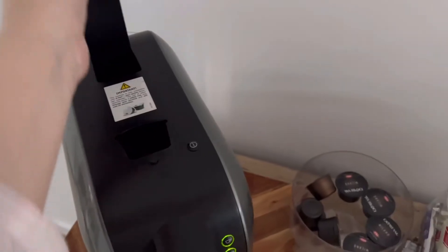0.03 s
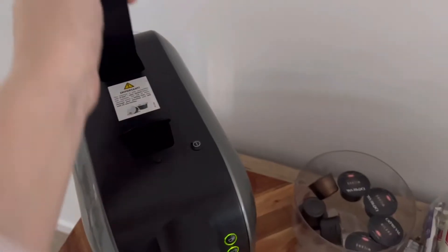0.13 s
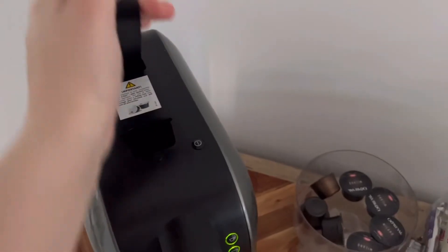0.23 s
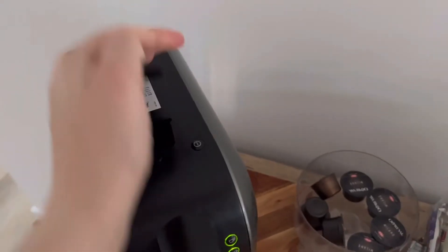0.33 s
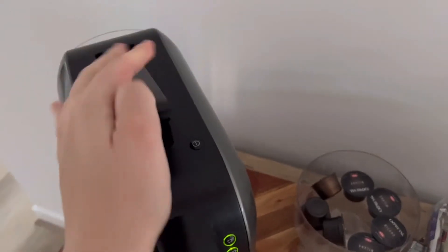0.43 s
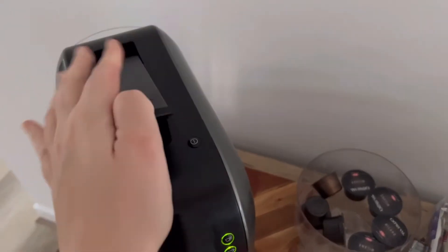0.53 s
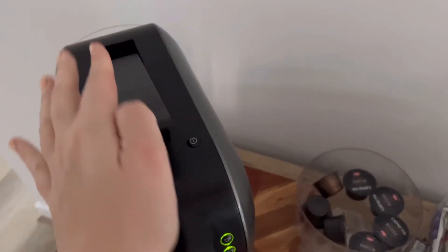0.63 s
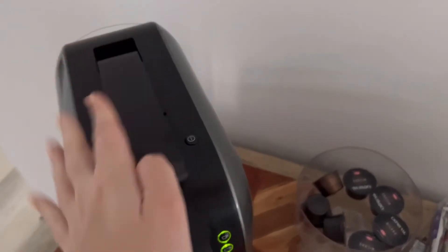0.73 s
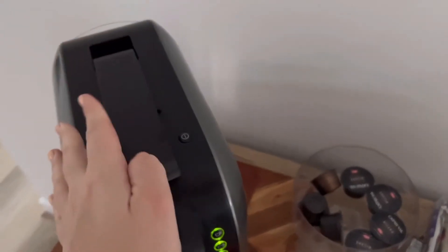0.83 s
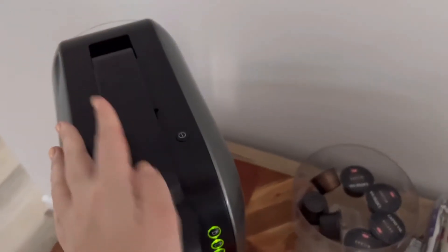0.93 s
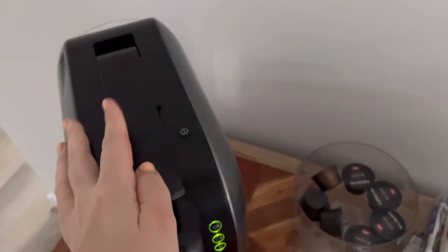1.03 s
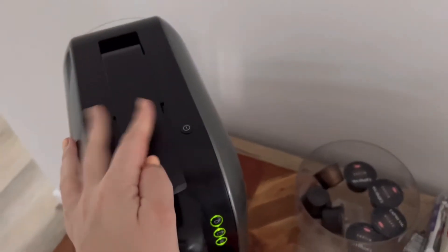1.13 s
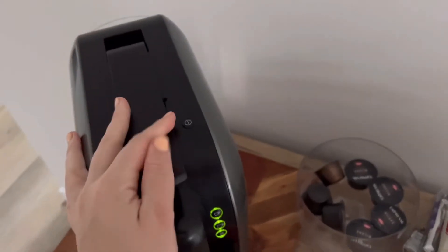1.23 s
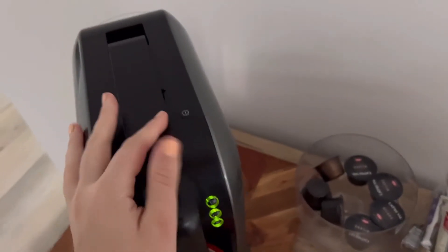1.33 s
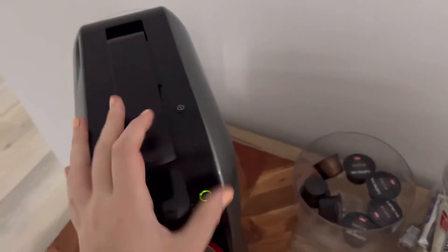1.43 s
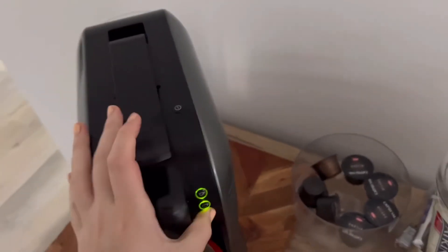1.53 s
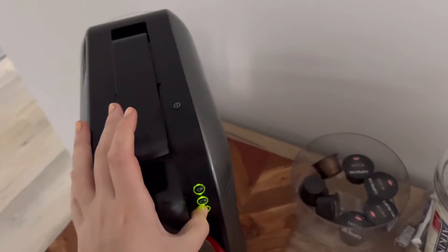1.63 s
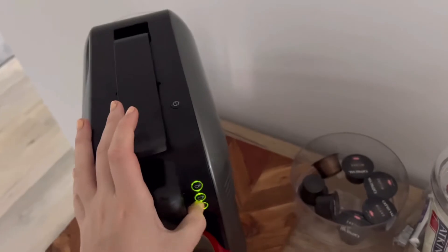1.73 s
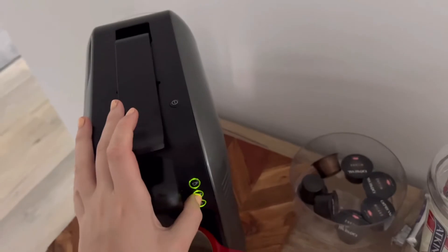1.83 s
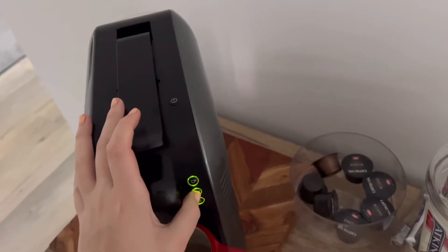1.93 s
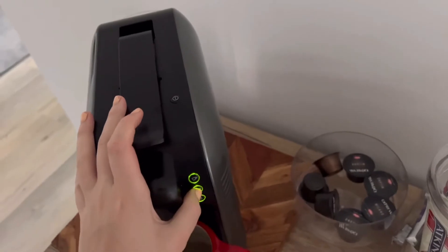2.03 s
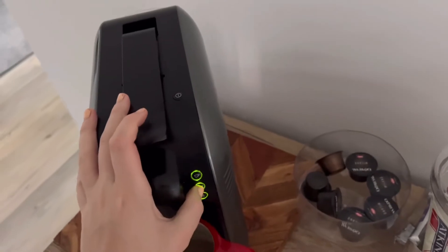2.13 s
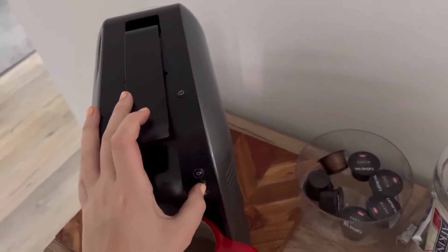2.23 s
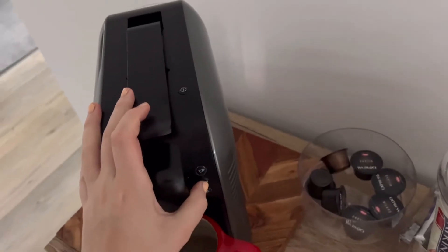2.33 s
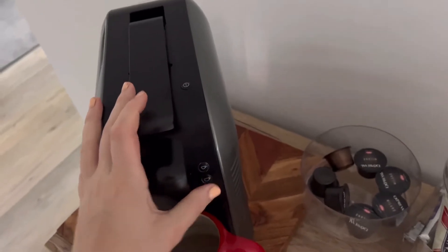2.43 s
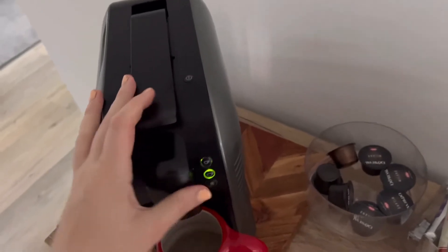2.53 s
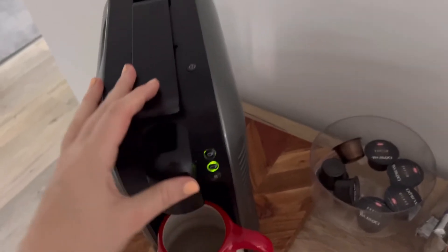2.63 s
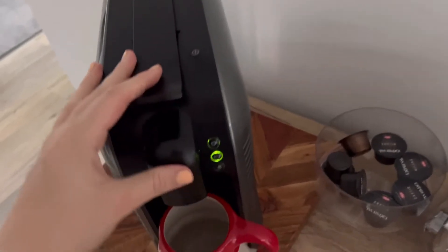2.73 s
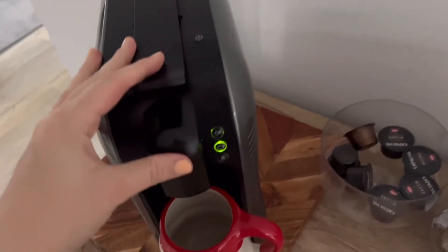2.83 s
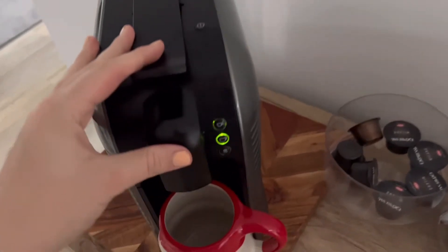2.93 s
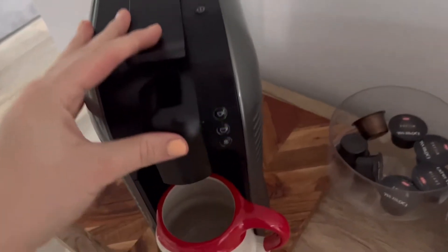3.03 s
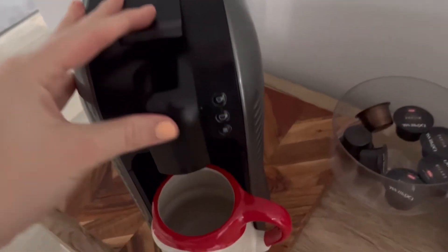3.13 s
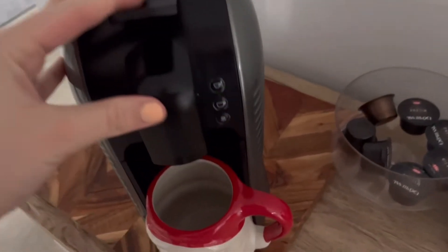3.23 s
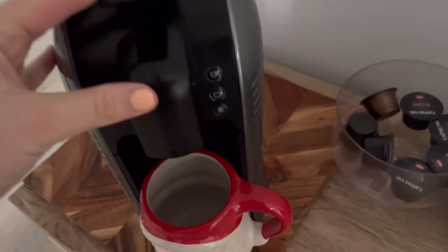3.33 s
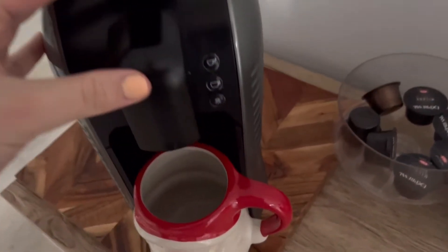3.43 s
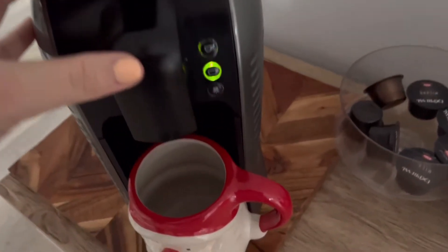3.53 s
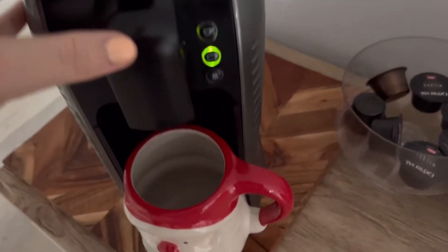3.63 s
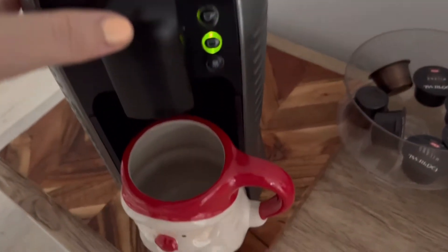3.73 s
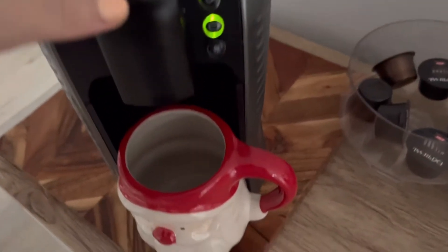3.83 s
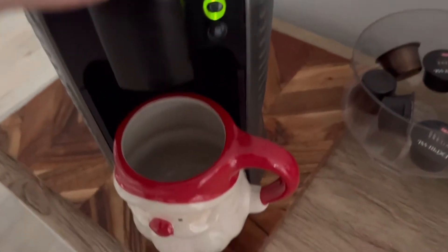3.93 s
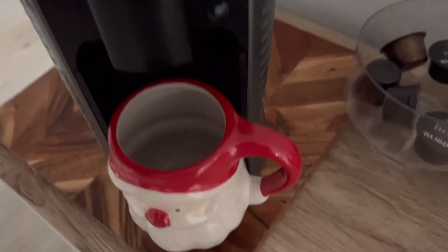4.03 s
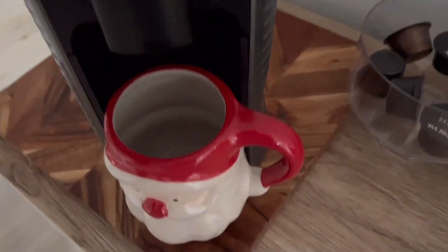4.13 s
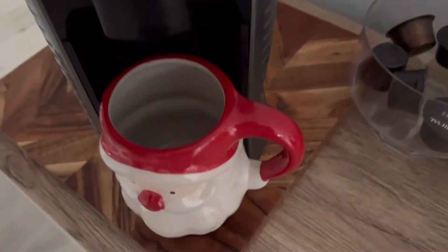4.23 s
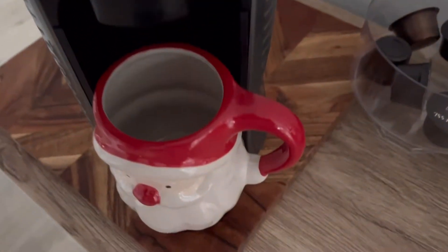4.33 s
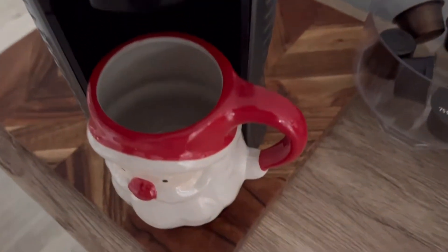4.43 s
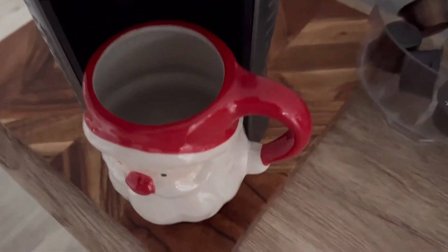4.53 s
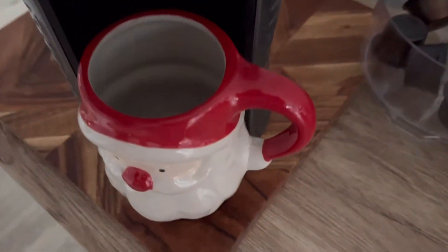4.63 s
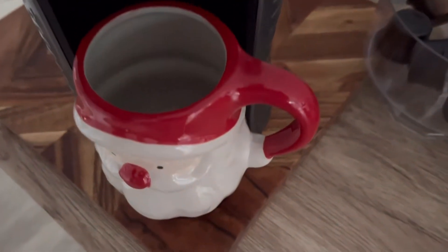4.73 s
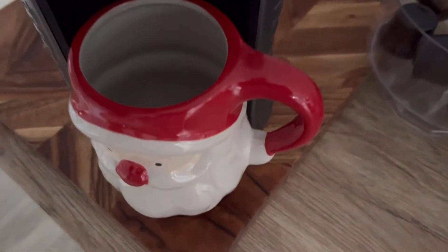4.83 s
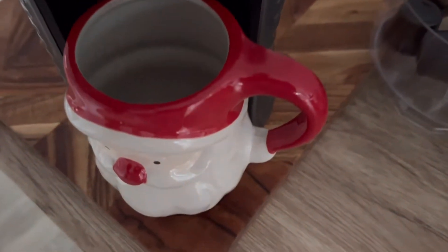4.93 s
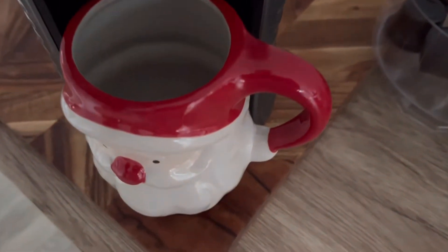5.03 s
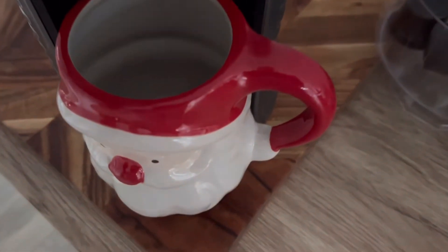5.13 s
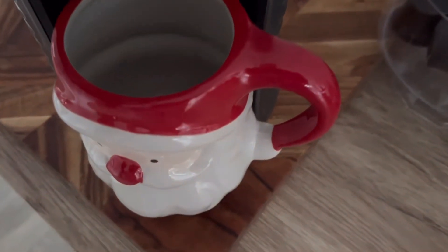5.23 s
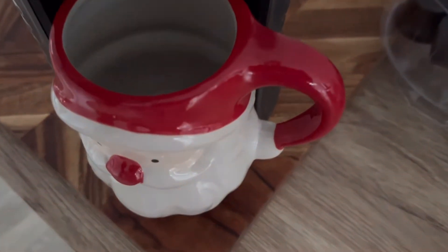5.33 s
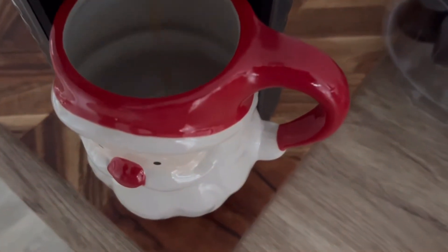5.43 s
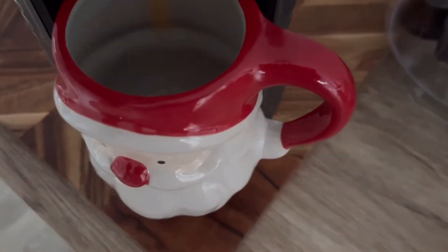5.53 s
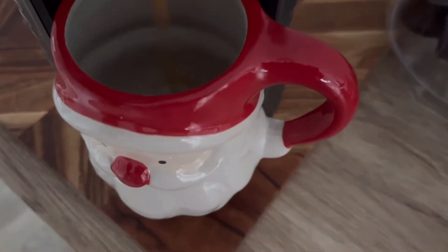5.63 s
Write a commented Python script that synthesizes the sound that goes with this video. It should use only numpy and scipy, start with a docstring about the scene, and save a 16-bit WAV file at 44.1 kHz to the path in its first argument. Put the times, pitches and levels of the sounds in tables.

```python
"""Capsule coffee machine

On a wooden counter, at arm's length in a bare kitchen. A hand rubs the case, the lever drags and snaps
over its latch, the lid knocks shut and the plastic case rocks; a button clicks. Then the piston pump
strokes at mains rate, its hum and rattle changing as pressure builds. The valve hisses, spits air and
squeaks; bubbles sizzle as water reaches the grounds."""
import sys
import numpy as np
from scipy import signal
from scipy.fft import rfft, irfft
from scipy.io import wavfile

SR = 44100
rng = np.random.default_rng(int(sys.argv[2]) if len(sys.argv) > 2 else 0)


def to_wav(sig):
    """Store sig (one row per channel, or 1-D mono) as 16-bit WAV at the path in sys.argv[1].

    Samples outside -1..1 are clipped; the rate is SR.
    """
    pcm = np.clip(np.atleast_2d(sig), -1, 1) * 32767
    pcm = np.round(pcm).astype(np.int16)
    wavfile.write(sys.argv[1], SR, pcm.T)  # frames by channels


N = 250929
T = np.arange(N) / SR


def undb(db):
    """Decibels to gain."""
    return 10 ** (np.asarray(db) / 20)


def unit(x):
    """Scale to rms 1."""
    return x / np.sqrt(np.mean(x ** 2))


def gain_at(points, hz):
    """Gain of a (frequency [Hz], level [dB]) spectrum at hz."""
    f, db = np.transpose(points)
    return undb(np.interp(np.log(np.maximum(hz, 1)), np.log(f), db))


def minimum_phase(log_gain):
    """Complex log spectrum of a causal filter, by cepstral folding."""
    cepstrum = irfft(log_gain)
    half = len(cepstrum) // 2
    cepstrum[1:half] *= 2
    cepstrum[half + 1:] = 0
    return rfft(cepstrum)


def convolve(x, response):
    """Convolve, keeping the length."""
    return signal.fftconvolve(np.atleast_2d(x), np.atleast_2d(response), axes=1)[:, :x.shape[-1]]


def colour(x, points):
    """Causal filter with the given spectrum."""
    log_gain = np.log(gain_at(points, np.fft.rfftfreq(4096, 1 / SR)))
    return convolve(x, irfft(np.exp(minimum_phase(log_gain))))


def pan(db):
    """Stereo gains for a left-minus-right level."""
    return undb(np.array([[1], [-1]]) * db / 2)


def add(track, start_s, sound):
    """Mix a sound in at start_s."""
    i = max(int(start_s * SR), 0)
    track[:, i:i + sound.shape[-1]] += sound[..., :N - i]


def swell(t, peak):
    """Envelope rising to 1 at peak, then decaying."""
    return t / peak * np.exp(1 - t / peak)


def bump(centre_s, width_s):
    """Gaussian envelope."""
    return np.exp(-((T - centre_s) / width_s) ** 2)


def ringing(modes, t):
    """Impulse response of (frequency [Hz], width [Hz], level [dB]) modes."""
    return sum(undb(db) * np.exp(-np.pi * width_hz * t) * np.sin(2 * np.pi * hz * t)
               for hz, width_hz, db in modes)


def scatter(shape):
    """Normal draws clipped at two sigma."""
    return np.clip(rng.standard_normal(shape), -2, 2)


def wander(t, rate_hz):
    """Complex random drift, linear between knots."""
    knots_s = np.arange(0, t[-1] + 1, 1 / rate_hz)
    return np.interp(t, knots_s, rng.standard_normal((len(knots_s), 2)) @ [1, 1j])


# stereo width: (frequency [Hz], side minus mid [dB])
WIDTH = [(100, -16), (380, -9), (700, -2), (1300, 2.5), (4400, -3.5), (12000, -1)]


def noise(count=N):
    """Stereo noise, narrow in the bass, wide in the treble."""
    mid, side = rng.standard_normal((2, count))
    width = gain_at(WIDTH, np.fft.rfftfreq(count, 1 / SR))
    spectrum = rfft(mid) + np.array([[1], [-1]]) * width * rfft(side)
    return irfft(spectrum / np.sqrt(1 + width ** 2), count)


# room tone: (frequency [Hz], level [dB])
KITCHEN_SPECTRUM = [(25, -13), (60, 1.5), (120, -2), (400, -14), (1500, -25), (3000, -36.5), (8000, -48.5),
                    (16000, -57)]


def kitchen_tone(level_db=-60.5):
    """Faint, steady low background."""
    return unit(colour(noise(), KITCHEN_SPECTRUM)) * undb(level_db)


# low background hum: (frequency [Hz], level [dB])
BACKGROUND_HUM_SPECTRUM = [(25, -37.5), (40, -16), (55, 1.5), (66, 2), (85, -17), (200, -45.5), (600, -76)]


def background_hum(level_db=-47.5, fade_at_s=1.37, fade_db_per_s=12):
    """Low steady hum near 60 Hz, perhaps a fridge; begins to fade before the pump starts."""
    gain = undb(level_db - fade_db_per_s * np.maximum(T - fade_at_s, 0))
    return unit(colour(noise(), BACKGROUND_HUM_SPECTRUM)) * gain


# hand rubs: (peak time [s], level [dB])
RUBS = [(0, -49.5), (.27, -43.5), (1.079, -35.5)]
# skin on plastic: (frequency [Hz], level [dB])
RUB_SPECTRUM = [(50, -12.5), (150, -0.5), (300, 1.5), (700, -10.5), (1500, -15.5), (3000, -27.5),
                (7000, -31.5), (10000, -38), (16000, -53.5)]


def hand_rubs(rise_db_per_s=65.5, fall_db_per_s=63.5):
    """Skin rubs over the lid in a few strokes."""
    rubbing = sum(undb(db - np.maximum((s - T) * rise_db_per_s, (T - s) * fall_db_per_s))
                  for s, db in RUBS)
    return unit(colour(noise(), RUB_SPECTRUM)) * rubbing


# lever drags: (time [s], length [s], level [dB])
SCRAPES = [(0, 0.027, -45), (0.16, 0.039, -44), (0.256, .06, -32), (.640, .02, -37)]
# sliding plastic: (frequency [Hz], level [dB])
SCRAPE_SPECTRUM = [(100, -13), (300, 4), (500, 2.5), (850, 2.5), (1400, -12), (3000, -19.5), (8000, -28),
                   (16000, -43)]


def lever_scrapes(slips_per_s=500, scatter_db=4):
    """The lever sticks and slips in its guide: dense, uneven ticks."""
    slips = (rng.random(N) < slips_per_s / SR) * undb(scatter_db * scatter(N))
    pressure = sum(undb(db) * np.sqrt(np.sin(np.pi * np.clip((T - s) / length_s, 0, 1)))
                   for s, length_s, db in SCRAPES)
    return unit(colour(slips * np.sign(noise()), SCRAPE_SPECTRUM)) * pressure


# plastic case: (frequency [Hz], level [dB], T60 [s])
CASE_MODES = [(97.9, -17, 0.41), (133.9, -17, 0.36), (184.8, -14, 0.31), (273.8, -10.5, 0.17),
              (308.6, -11.5, 0.19), (368, -7.5, 0.18), (516.4, -9, 0.081), (587, -7, 0.033),
              (819, -1, 0.024), (1040, -7.5, 0.026), (1234, -10, 0.033), (1430, -7, 0.03),
              (2260, -18, 0.031)]
# plastic hitting plastic: (frequency [Hz], level [dB])
CRACK_SPECTRUM = [(200, -15.5), (700, 1.5), (1200, -2), (2100, 6.5), (3000, 4.5), (4500, -4.5), (5500, 0),
                  (6600, 3), (7500, -6.5), (8500, 2), (12000, -4.5), (16000, -14)]


def blow(thud_hz, contact_s, hardness_db, rise_s=0.0029):
    """A blow cracks at the contact, heaves a panel and rings the case."""
    t = T[:SR // 3]
    signs = np.sign(rng.standard_normal(len(CASE_MODES)))  # set by the spot struck
    ring = sum(sign * undb(db - 60 * t / t60_s) * np.sin(2 * np.pi * hz * t)
               for sign, (hz, db, t60_s) in zip(signs, CASE_MODES))
    ring_db = 3 + 0.27 * hardness_db + 8 * np.log2(contact_s / 0.005)  # harder or longer rings more
    thud = swell(t, 2 * contact_s) ** 2 * np.sin(2 * np.pi * thud_hz * t)
    crack = unit(colour(noise(len(t)), CRACK_SPECTRUM)) * np.exp(-t / (0.84 * contact_s))
    onset = 1 - np.exp(-(t / rise_s) ** 2)
    return thud + (undb(ring_db) * ring + undb(hardness_db) * crack) * onset


# blows on the case: (time [s], level [dB], thud [Hz], contact [s], crack over thud [dB])
KNOCKS = [(.165, -42, 402, .005, -3), (.180, -34, 275, 0.0073, -17), (.268, -27.5, 399.5, .0065, 1),
          (.344, -26, 268, 0.0041, -0.5), (0.561, -40, 277, 0.0066, -1), (.665, -20, 373, 0.0054, 3),
          (.677, -19.5, 260.6, 0.0065, -17), (.917, -19, 597, 0.0031, 23), (0.9232, 0, 259, .0023, -9),
          (0.944, -18.5, 102, 0.0023, -17), (1.575, -63, 246.4, 0.0033, 7), (1.736, -61, 335, 0.011, 11.5),
          (2.1, -42, 468, 0.006, 11), (2.175, -48, 365, 0.006, 9.5), (2.185, -22.5, 395, 0.0022, -4),
          (2.216, -31.5, 205, 0.0037, 1)]


def knocks():
    """Lever, lid, finger and pump start knock the case."""
    out = np.zeros((2, N))
    for s, db, thud_hz, contact_s, hardness_db in KNOCKS:
        add(out, s, undb(db) * blow(thud_hz, contact_s, hardness_db))
    return out


# latch clicks: (time [s], level [dB])
LATCH_CLICKS = [(0.22, -29.5), (0.294, -18.5), (0.3197, 2), (0.3354, 2), (0.352, -19.5), (0.358, -16.5),
                (0.3758, -12)]
# latch resonances: (frequency [Hz], width [Hz], level [dB])
LATCH_MODES = [(1660, 170, -8), (2550, 220, -5), (2778, 190, 0.5), (2880, 200, 3.5), (3080, 220, -6),
               (6250, 370, -1), (8320, 830, -4.5), (11700, 1400, -6.5), (15000, 1500, -16.5)]
# latch radiation: (frequency [Hz], left minus right [dB])
LATCH_PAN = [(1600, 3), (2900, 3), (6200, 0.5), (8300, -6), (12000, 1.5)]


def latch(rise_s=0.0014, grit_peak_s=0.0017, grit_db=-14, ring_db=-4):
    """The sprung lever snaps over: stiff, well damped parts scrape and ring."""
    out, t = np.zeros((2, N)), T[:SR // 20]
    ring = sum(ringing([mode], t) * pan(np.interp(mode[0], *np.transpose(LATCH_PAN)))
               for mode in LATCH_MODES)
    ring *= 1 - np.exp(-(t / rise_s) ** 2)
    for s, db in LATCH_CLICKS:
        grit = unit(colour(noise(len(t)), CRACK_SPECTRUM)) * swell(t, grit_peak_s) ** 3
        add(out, s, undb(db) * (undb(ring_db) * ring + undb(grit_db) * grit))
    return out


# shoves: (time [s], level [dB], thud [Hz], first gap [s], loss per rock [dB])
SHOVES = [(0.729, -24.5, 162, 0.064, 5.5), (.962, -22, 266, .063, 11), (1.112, -20, 189, .075, 7)]


def rocking(rocks=5, gap_ratio=0.99):
    """The shoved machine drops from foot to foot, softer and slightly sooner each time."""
    out = np.zeros((2, N))
    for s, db, thud_hz, gap_s, loss_db in SHOVES:
        for k in range(rocks):
            add(out, s, undb(db - k * loss_db) * blow(thud_hz, contact_s=0.0042, hardness_db=-33.5))
            s += gap_s * gap_ratio ** k
    return out


# button cap: (frequency [Hz], width [Hz], level [dB])
BUTTON_MODES = [(1130, 12, -17), (1700, 53, -6), (2076, 51, -0.5), (2250, 75, -3), (7570, 340, -2)]


def button(time_s=2.1025, level_db=-36.5):
    """The start button's hollow cap rings as it clicks home."""
    out = np.zeros((2, N))
    add(out, time_s, undb(level_db) * ringing(BUTTON_MODES, T[:SR // 10]))
    return out


def stroke_harmonics(levels):
    """Complex harmonics 1-31 of a stroke ringing the case, total rms 1."""
    harmonic, db = np.transpose(levels)
    k = np.arange(129)
    gain = undb(np.interp(k, harmonic, db) - np.clip(2 * (k - harmonic[-1]), 0, 20))
    # broad resonances set the phase; narrow dips only thin single harmonics
    broad_power = np.convolve(gain ** 2, np.ones(5), "same")
    angle = minimum_phase(0.5 * np.log(broad_power)).imag
    lines = (gain * np.exp(1j * angle))[1:32]
    return lines / np.sqrt(np.sum(abs(lines) ** 2) / 2)


PUMP_START_S, STROKE_HZ = 2.1865, 50.05
# hum per load stage: (harmonic [multiple of stroke rate], level [dB])
PRIMING = [(1, -8), (2, -10), (3, -2), (4, 11), (5, 12), (6, 11), (7, 6.5), (8, -9), (9, -6), (10, 6),
           (11, 2), (12, -1), (13, 3.5), (14, -36), (15, -10), (16, -9), (17, -12), (18, -6.5)]
FILLING = [(1, -0.5), (2, -17), (3, 2), (4, -6.5), (5, -2), (6, -7.5), (7, 5.5), (8, 5.5), (9, -0.5),
           (10, -2), (11, -7.5), (12, -5.5), (13, -4), (14, -15.5), (15, -7.5), (16, -13.5), (17, -24),
           (18, -24), (19, -12.5), (20, -25), (21, -36)]
WETTING = [(1, -2), (2, -15), (3, 2.5), (4, -2), (5, 4), (6, -1.5), (7, 0), (8, -1), (9, -11), (10, -2),
           (11, -29), (12, 1.5), (13, -3.5), (14, -7), (15, -18), (16, -14), (17, -16), (18, -27),
           (19, -18), (20, -10.5), (21, -10.5), (22, -40), (23, -17), (24, -32)]
PRESSING = [(1, -7), (2, -6.5), (3, 2), (4, -49), (5, -11.5), (6, -8), (7, -4), (8, 1.5), (9, 0.5),
            (10, -12), (11, -4.5), (12, -8), (13, -1.5), (14, -48), (15, -11.5), (16, -6), (17, -33),
            (18, -40), (19, -11.5), (20, -42), (21, -25), (22, -24), (23, -17), (24, -27.5)]


def pump_hum(cycles, load, level_db=-31.5, waver=0.054, waver_hz=4, stutter=0.55, settle_s=0.3,
             panel_hz=280, panel_width_hz=65, lag_s=0.001, smear_per_khz=1.5, spread_rad=0.48):
    """The piston shakes the case once per mains cycle; load reshapes the harmonics."""
    fade_in = np.clip(cycles * 10, 0, 1)
    step = 10  # low frequencies only: run at SR / step
    t, cycles, load = T[::step], cycles[::step], load[::step]
    unsettled = stutter * np.exp(-cycles / STROKE_HZ / settle_s)  # first strokes, on trapped air
    spectra = [stroke_harmonics(stage) for stage in (PRIMING, FILLING, WETTING, PRESSING)]
    stages, out = np.arange(len(spectra)), 0
    for k, by_stage in enumerate(np.transpose(spectra), 1):
        hz = k * STROKE_HZ
        gain = np.interp(load, stages, abs(by_stage))
        angle = np.interp(load, stages, np.unwrap(np.angle(by_stage)))
        # the side panel stores each blow and returns it late
        angle -= 2 * np.arctan((hz - panel_hz) / panel_width_hz) + 2 * np.pi * hz * lag_s
        # standing waves scramble the upper harmonics and differ left to right
        angle += smear_per_khz * hz / 1000 * rng.uniform(-np.pi / 2, np.pi / 2)
        stereo_angle = spread_rad * gain_at(WIDTH, hz) * (-1) ** k * np.array([[1], [-1]])
        drift = 1 + waver * wander(t, waver_hz) + unsettled * wander(t, STROKE_HZ / 2)
        out += (gain * drift * np.exp(1j * (2 * np.pi * k * cycles + angle + stereo_angle))).real
    return signal.resample_poly(out, step, 1, axis=1)[:, :N] * undb(level_db) * fade_in


def piston_impacts(number, phase, load, attack_cycles=0.06, decay_cycles=0.51, return_cycles=0.72,
                   return_db=-10, scatter_db=2.5):
    """Stroke force, envelope of the strike on the stop, envelope of the return clack under load."""
    force, return_force = undb(scatter_db * scatter((number[-1] + 1, 2)))[number].T
    strike = force * np.exp(-phase / decay_cycles) * (1 - np.exp(-phase / attack_cycles))
    clack = return_force * undb(return_db) * load / 2 * swell((phase - return_cycles) % 1, 0.1)
    return force, strike, clack


# pipes and panels: (frequency [Hz], width before width_scale [Hz], level [dB])
PIPE_MODES = [(1633, 83, -2.5), (1912, 63, -6), (2570, 110, 0.5), (3207, 140, 5.5), (3473, 220, 6),
              (3900, 175, 5.5), (4400, 175, 2.5), (5480, 960, 16)]


def pipe_pings(number, phase, detune=0.02, scatter_db=2.7, rise_s=0.0027, width_scale=0.24):
    """Each stroke rings pipes and panels afresh, varying in pitch and strength."""
    t, out = phase / STROKE_HZ, 0
    window = (1 - np.exp(-(t / rise_s) ** 2)) * (1 - phase ** 4)
    for hz, width_hz, db in PIPE_MODES:
        pitch, size, left, right = scatter((number[-1] + 1, 4))[number].T
        envelope = window * np.exp(-np.pi * width_scale * width_hz * t)
        angle = 2 * np.pi * hz * (1 + detune * pitch) * t + np.array([left, right])
        out += undb(db + scatter_db * size) * envelope * np.sin(angle)
    return out


# piston rattle: (frequency [Hz], level [dB])
RATTLE_SPECTRUM = [(150, 9), (400, 12.5), (800, 5.5), (1100, 2.5), (1300, 1.5), (1650, -4), (2300, -1.5),
                   (2650, 2.5), (3300, -3), (4400, -4.5), (5200, -8.5), (8500, -6.5), (16000, -60)]


def piston_rattle(number, phase, force, impacts, steady=0.25, repeat_share=0.36, ping_db=-7):
    """Impacts clatter and ping; part of the clatter repeats on every stroke."""
    running = T > PUMP_START_S
    period = int(SR / STROKE_HZ)
    repeated = noise(period + 1)[:, (phase * period).astype(int)]
    grain = np.sqrt(repeat_share) * repeated + np.sqrt(1 - repeat_share) * noise()
    clatter = unit(colour(grain * (steady + impacts) * running, RATTLE_SPECTRUM))
    pings = unit(pipe_pings(number, phase) * force * running)
    return unit(clatter + undb(ping_db) * pings)


# water in the valve: (frequency [Hz], level [dB])
HISS_SPECTRUM = [(1000, 7), (4000, 8), (6500, -2.5), (8500, 8.5), (11600, 10), (16000, -2.5)]


def valve_hiss(strike, clack, steady=0.72, gush_at_s=4, gush_width_s=0.41, gush_db=4.5):
    """Water pulses through the valve, swelling as it forces into the capsule."""
    flow = (steady + 2 * strike ** 2 + clack) * (T > PUMP_START_S)
    gush = undb(gush_db * bump(gush_at_s, gush_width_s))
    return unit(colour(noise() * flow, HISS_SPECTRUM)) * gush


# air pockets: (time [s], level [dB], ring [Hz])
SPITS = [(2.303, -37.5, 1500), (2.844, -33, 847), (3.828, -32, 2520), (3.845, -43, 3570),
         (4.106, -27.5, 2520), (4.121, -36.5, 2470), (5.582, -35, 3450)]


def valve_spits(ring_peak_s=0.0038, tick_decay_s=0.0089, tick_db=-5):
    """Air pockets tick through the valve and ring the pipe."""
    out, t = np.zeros((2, N)), T[:SR // 20]
    for s, db, hz in SPITS:
        tick = unit(colour(noise(len(t)), HISS_SPECTRUM)) * np.exp(-t / tick_decay_s)
        ring = 0.5 * swell(t, ring_peak_s) * np.sin(2 * np.pi * hz * t)
        add(out, s, undb(db) * (ring + undb(tick_db) * tick))
    return out


# squeaky spells: (centre time [s], half width [s], pitch [Hz], level [dB])
SQUEAKS = [(3.452, 0.32, 3040, -57), (5.45, 0.23, 2770, -47)]


def valve_squeaks(cycles, open_cycles=0.27, width_cycles=0.096, glide=0.095, detune=0.026, scatter_db=4):
    """The valve gives a tiny rising chirp as it opens in each stroke."""
    number, phase, out = cycles.astype(int), cycles % 1 - open_cycles, 0
    for s, width_s, hz, db in SQUEAKS:
        pitch, size = scatter((number[-1] + 1, 2))[number].T
        turns = hz / STROKE_HZ * (1 + detune * pitch) * (phase + glide * phase ** 2 / 2)
        chirp = np.exp(-(phase / width_cycles) ** 2) * np.sin(2 * np.pi * turns)
        out += chirp * undb(db + scatter_db * size) * bump(s, width_s)
    return out * (cycles > 0)


# pump load: (time [s], stage [0 priming, 1 filling, 2 wetting, 3 pressing])
PUMP_LOAD = [(2.18, 0.78), (2.36, 0.15), (2.6, 1.18), (3.3, 1.28), (3.8, 1.89), (4.25, 2.24), (4.7, 2.57)]


def pump(build_s=3.5, lead_cycles=0.04, rattle_db=-44, rattle_rise_db=4, hiss_db=-53.5, hiss_rise_db=2):
    """One piston drives hum, rattle, hiss and squeaks; rattle and hiss grow with pressure."""
    age_s = np.maximum(T - PUMP_START_S, 0)
    cycles = age_s * STROKE_HZ
    pressure = (age_s / build_s) ** 2
    load = np.interp(T, *np.transpose(PUMP_LOAD))
    hum = pump_hum(cycles, load)
    number, phase = (cycles + lead_cycles).astype(int), (cycles + lead_cycles) % 1
    force, strike, clack = piston_impacts(number, phase, load)
    rattle = piston_rattle(number, phase, force, strike + clack)
    rattle *= undb(rattle_db + rattle_rise_db * pressure)
    hiss = valve_hiss(strike, clack) * undb(hiss_db + hiss_rise_db * pressure)
    return hum + rattle + hiss + valve_squeaks(cycles)


def sizzle(start_s=5.22, level_db=-43, spread_db=14, low_hz=2284, high_hz=3220, peak_s=0.0012):
    """Water reaches the grounds: a growing crowd of tiny ringing bubbles."""
    out, t = np.zeros((2, N)), T[:SR // 50]
    for when, pitch, faintness, side in rng.random((400, 4)):
        hz = low_hz + pitch * (high_hz - low_hz)
        bubble = swell(t, peak_s) * np.sin(2 * np.pi * hz * t)
        s = start_s + np.sqrt(when)
        if s < T[-1]:
            add(out, s, undb(level_db - spread_db * faintness) * pan(spread_db * (side - 0.5)) * bubble)
    return out


def room(x, t60_s=0.76, tail_db=-11, early_db=-10, early_decay_s=0.022):
    """Early echoes off counter and wall, then the kitchen's tail."""
    t = T[:SR]
    onset = np.clip((t - 0.003) / 0.00047, 0, 1)
    tail = unit(noise(len(t)) * onset * undb(-60 * t / t60_s))
    early = unit(noise(len(t)) * onset * np.exp(-t / early_decay_s))
    response = (undb(tail_db) * tail + undb(early_db) * early) / np.sqrt(len(t))
    # (frequency [Hz], level [dB])
    spectrum = [(80, 9.5), (250, -2.5), (800, 3), (2800, -1), (7000, -2), (12000, -12), (16000, -9)]
    return convolve(x, colour(response, spectrum))


def scene():
    """Transients with room echo; pump, hand and background dry."""
    pumping = pump()
    hits = latch() + knocks() + rocking() + lever_scrapes() + button() + valve_spits() + sizzle()
    return kitchen_tone() + hits + room(hits) + pumping + hand_rubs() + background_hum()


# microphone ports, deep bass cut and top-octave ripple: (frequency [Hz], gain [dB])
PORT_RESPONSE = [(25, -10.5), (45, -0.5), (9000, 0), (10200, -28.5), (11400, 4), (12600, -2.5),
                 (13900, -12), (15200, 2)]
# port imbalance: (frequency [Hz], left minus right [dB])
PORT_BALANCE = [(100, -2), (200, -3.5), (380, 0.5), (700, 1), (1300, 3.5), (2400, 1.5), (4400, 5),
                (8000, -1.5), (14000, 0)]


def record(dry, cutoff_hz=15900):
    """Two microphone ports colour the sound; then soft clip and low-pass."""
    hz = np.fft.rfftfreq(N, 1 / SR)
    balance = gain_at(PORT_BALANCE, hz) ** np.array([[0.5], [-0.5]])
    coloured = irfft(rfft(dry) * gain_at(PORT_RESPONSE, hz) * balance, N)
    clipped = coloured / (1 + coloured ** 6) ** (1 / 6)
    return signal.sosfilt(signal.ellip(8, 0.2, 70, cutoff_hz, fs=SR, output="sos"), clipped)


dry = scene()
out = record(dry)
to_wav(out)
```